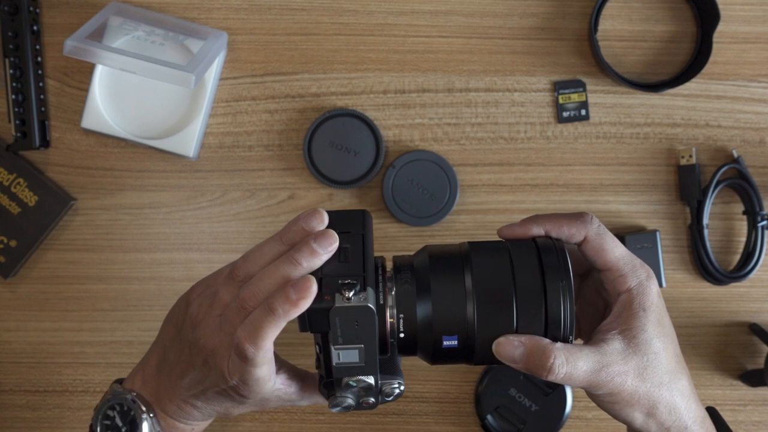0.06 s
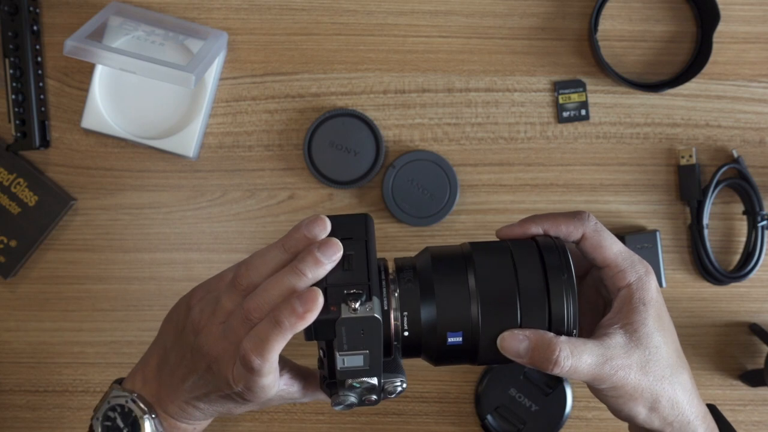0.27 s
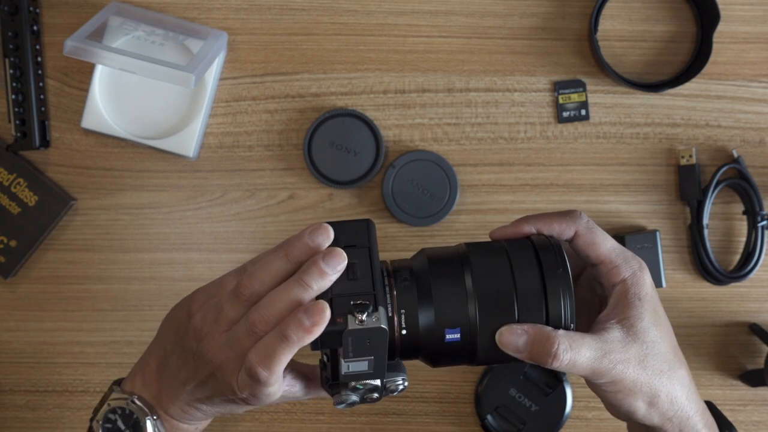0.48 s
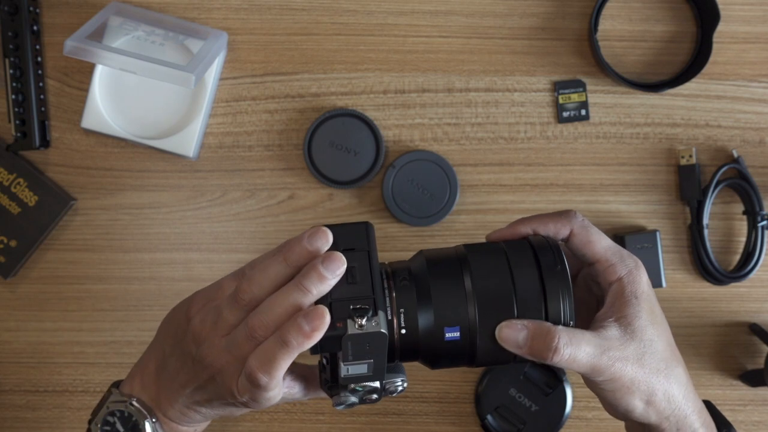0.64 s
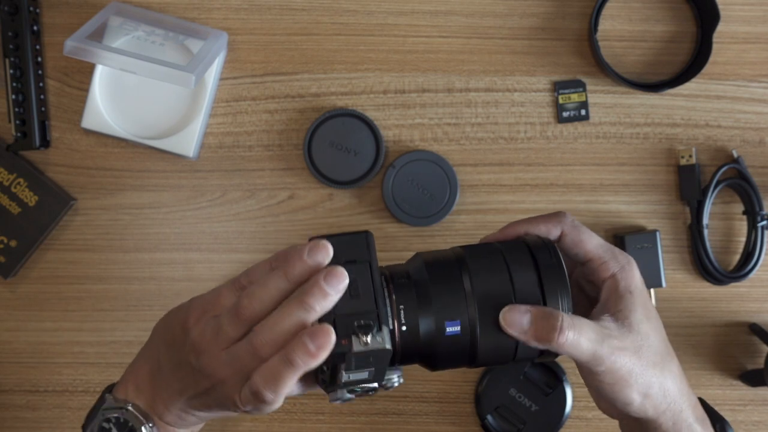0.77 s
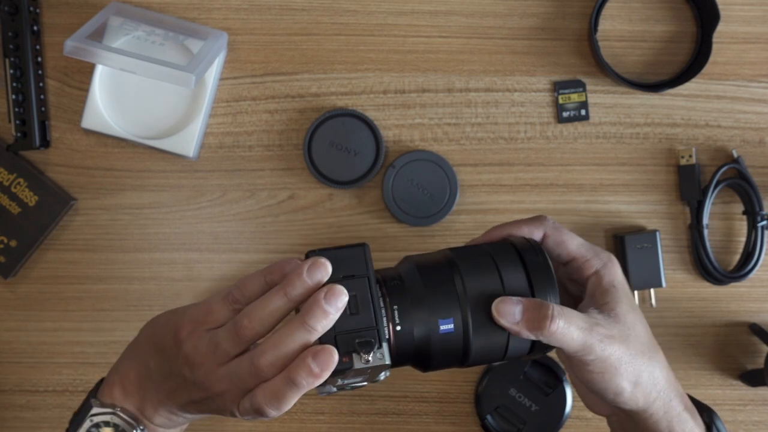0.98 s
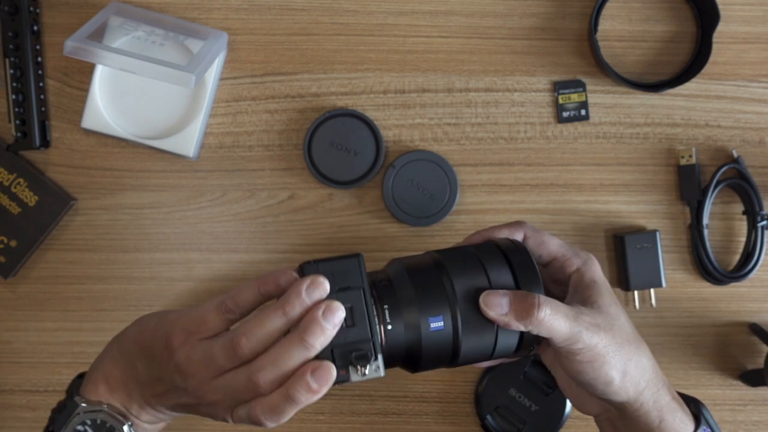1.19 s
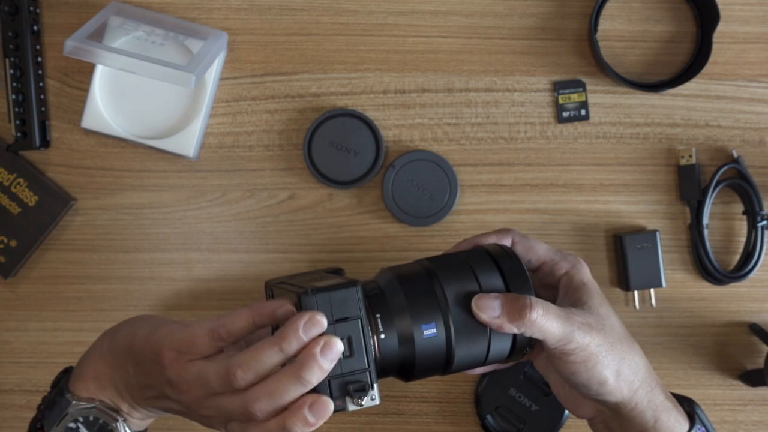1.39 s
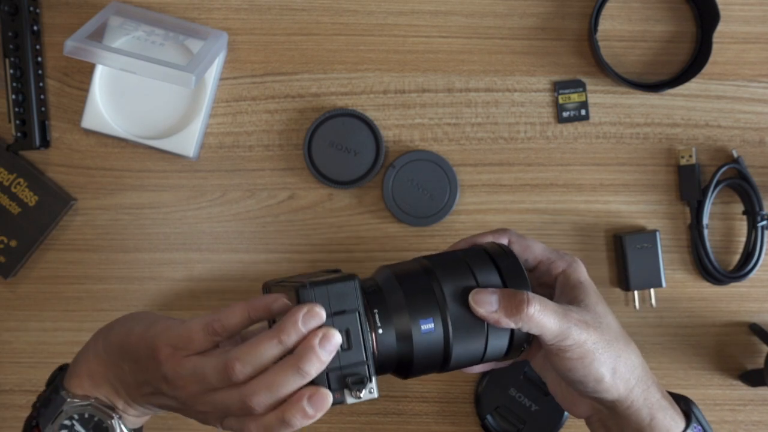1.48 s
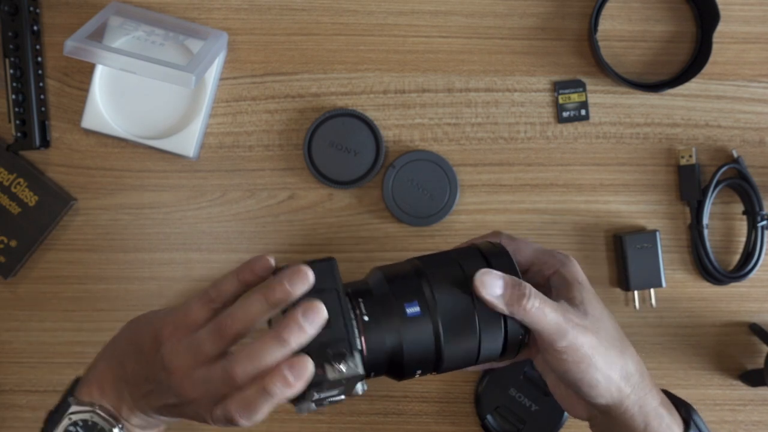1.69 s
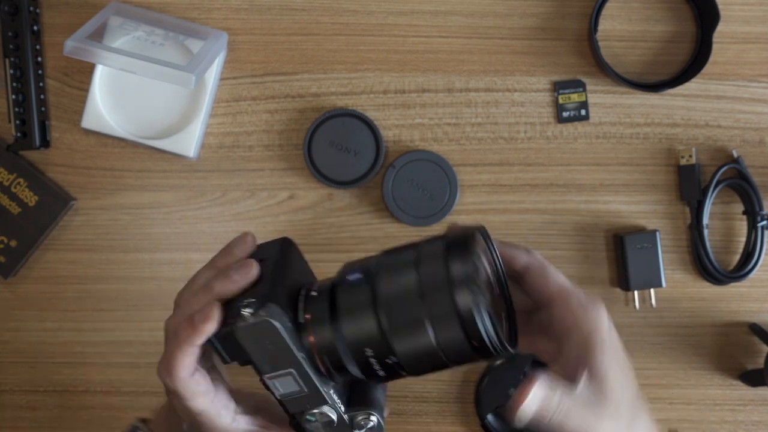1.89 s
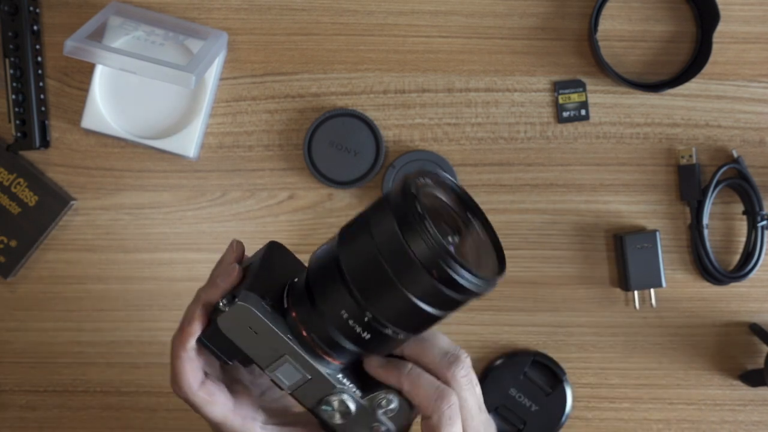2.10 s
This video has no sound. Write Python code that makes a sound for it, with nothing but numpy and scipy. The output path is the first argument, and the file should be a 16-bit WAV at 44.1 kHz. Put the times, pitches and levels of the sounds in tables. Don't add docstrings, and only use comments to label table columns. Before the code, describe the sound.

A camera lens is fitted onto a body: faint taps, one solid knock, a small touch, then a sharp metallic lock click and light handling ticks, close up in a small quiet room with low fan hum.

```python
import sys
import numpy as np
from scipy import signal
from scipy.fft import rfft, irfft, next_fast_len
from scipy.io import wavfile
from scipy.ndimage import uniform_filter1d

SR = 44100
rng = np.random.default_rng(int(sys.argv[2]) if len(sys.argv) > 2 else 0)


def digitize_waveform(pressure):
    field = np.atleast_2d(pressure).T
    bounded = np.clip(field, -1, 1)
    quanta = np.round(bounded * 32767).astype(np.int16)
    wavfile.write(sys.argv[1], SR, quanta)


def gain_from_db(level_db):
    decades = np.asarray(level_db, float) / 20
    return 10 ** decades


N = 94462

# pitch_hz, width_hz, level_db
FAN_DRONE = [(29.8, 12.6, -22), (53.6, 15, -21), (87, 19, -9), (111.9, 7.3, 1.5), (161.3, 16.4, 0),
             (220.3, 59, -12)]
# pitch_hz, width_hz, level_db
FAN_WHINE = [(958, 49, -1), (1530, 73, -2), (2175, 56, 5.5)]
# pitch_hz, level_db
AIR_COLOUR = [(18, -53), (30, -23), (157, -2), (394, -20.5), (913, -22.5), (1860, -24), (2230, -21.5),
              (2540, -27), (16000, -45)]
# pitch_hz, likeness (1 = same)
TONE_ALIKE = [(60, 1), (180, 0.98), (550, 0.063), (1650, 0.093), (4970, 0.097), (15000, 0.56)]
# pitch_hz, time_to_fall_60_db_s
ROOM_FADE = [(250, 0.25), (600, 0.39), (1500, 0.3), (4000, 0.35), (9000, 0.33), (15000, 0.3)]
# pitch_hz, level_db
ROOM_COLOUR = [(250, 0), (500, -2.5), (1500, -4), (3500, 1), (12000, 0)]
# pitch_hz, likeness (1 = same)
ROOM_ALIKE = [(200, 1), (1000, 0.77), (4000, 0.55), (12000, 0.57)]
# pitch_hz, left_minus_right_db
STEREO_LEAN = [(500, -1), (2000, -1), (6000, -3), (14000, -3.4)]
# time_s, level_db
RUB_LEVEL = [(0, -60), (0.098, -93), (.34, -94), (.375, -72), (.4, -87), (.66, -65.5), (.75, -73),
             (.9, -76), (.96, -71.5), (1.05, -88), (1.7, -74.5), (1.77, -58.5), (1.8, -62.5), (1.88, -70),
             (1.93, -66), (1.96, -54.5), (2.01, -71), (2.14, -65)]
# pitch_hz, level_db
RUB_COLOUR = [(1470, -27), (2500, -2), (4050, 6), (4580, 0), (5850, -1.5), (7320, 0), (14000, -9)]
# pitch_hz, width_hz, level_db
BODY_NOTES = [(255, 78, -9.5), (423, 22, 8), (533, 39, -3), (755, 26, 2.5), (869, 62, -2.5),
              (1204, 30.7, 5), (1340, 31.8, 8), (1479, 65.3, 7), (1770, 147, -7)]
# pitch_hz, width_hz, level_db
BARREL_NOTES = [(1545, 80, -4.5), (2067, 250, -7), (2279, 108, 0.5), (2666, 29, -1), (3033, 203, -10.5)]
# pitch_hz, width_hz, level_db
RING_NOTES = [(3498, 111, 4), (3831, 58, 8), (3870, 71, 8.5), (4600, 430, 2), (5460, 340, 1)]
# pitch_hz, width_hz, level_db
PIN_NOTES = [(6360, 570, 5.5), (8090, 990, 4), (9540, 990, 4.5), (12100, 2400, -2), (15600, 4300, -7)]
# start_s, body_db, barrel_db, steel_db, contact_ms
KNOCKS = [(.002, -49.5, -76, -81, 13.3), (.015, -51, -61, -61, 8), (0.0227, -39, -74, -55.5, 9),
          (.181, -53, -59.5, -66, 9.6), (0.192, -48.5, -54, -59.5, 11.8), (.406, -50.5, -63, -79, 14),
          (0.4209, -35.5, -57, -46, 11), (0.4362, -30, -36, -34, 3.4), (.4396, -17.5, -26, -26.5, 6),
          (.447, -22.5, -28.5, -28.5, 4), (.4515, -23.5, -35, -43, 4), (.686, -52.5, -59, -66, 29.4),
          (0.9143, -42.5, -43.5, -49.5, 5.85)]
# start_s, barrel_db, ring_db, pin_db, contact_ms
CLICKS = [(0.37, -73, -69, -67, 12), (0.9388, -53, -45, -60, 4.8), (.948, -55.5, -61.5, -62, 13.4),
          (1.128, -63, -65.5, -67.5, 11.7), (1.380, -50, -44, -48, 6.1), (1.3848, -27, -30, -30.5, 4),
          (1.401, -69, -38, -63.5, 7), (1.8116, -62, -44.5, -46, 2.2), (1.9075, -70, -54.5, -59, 2.1),
          (1.940, -75, -53, -59, 8.6), (1.972, -74, -58, -55.5, 9), (2.044, -67, -61, -74.5, 6.7),
          (2.1246, -70, -44.5, -43.5, 4.7)]

DRONE_DB, WHINE_DB, AIR_DB = -52.5, -64, -61.5
ROOM_DB, ROOM_DELAY_S = -4.5, 0.0044
KNOCK_ROOM_DB, CLICK_ROOM_DB = 0.5, 2.5
ROOM_BLUR = 0.6
THUD_DB, CRACK_DB = -19.5, -11.5
SCATTER_DB = 1.5
RISE = 0.152
KNOCK_EDGE_HZ, PIN_IN_KNOCK_DB = 5340, -4.5
DAMP_PER_DB = 0.15
CLICK_EDGE_HZ, CLICK_OCTAVES_PER_DB = 27000, 0.17
TREBLE_TOP_HZ = 15750


def unit(x):
    return x / np.sqrt(np.mean(x ** 2) + 1e-20)


def along(points, hz):
    f, v = np.transpose(points)
    return np.interp(np.log(hz + 1), np.log(f + 1), v)


def filtered(x, response):
    n = x.shape[-1]
    size = next_fast_len(n + 8192)
    hz = np.fft.rfftfreq(size, 1 / SR)
    return irfft(rfft(x, size) * response(hz), size)[..., :n]


def resonant(notes, f, scatter_db=0):
    scatter = np.broadcast_to(scatter_db, len(notes))
    total = 0
    for k, (pitch, width, db) in enumerate(notes):
        peak = 1j * f * width / (pitch * pitch - f * f + 1j * f * width)
        total = total + (-1) ** k * gain_from_db(db + scatter[k]) * peak
    return total


def spread(pair, gain, alike):
    def response(hz):
        turn = np.arccos(np.clip(along(alike, hz), -1, 1)) / 2
        return gain(hz) * np.array([np.cos(turn), np.sin(turn)])

    mid, side = filtered(pair, response)
    return np.array([mid + side, mid - side])


def room_tone():
    def drone_gain(f):
        low_cut = (f / 60) ** 2 / (1 + (f / 60) ** 2)
        return resonant(FAN_DRONE, f) * low_cut / (1 + (f / 260) ** 4)

    def whine_gain(f):
        return resonant(FAN_WHINE, f)

    def air_gain(f):
        low_cut = (f / 200) ** 2 / (1 + (f / 200) ** 2)
        return gain_from_db(along(AIR_COLOUR, np.maximum(f, 300))) * low_cut

    tone = 0
    for gain, db in [(drone_gain, DRONE_DB), (whine_gain, WHINE_DB), (air_gain, AIR_DB)]:
        noise = rng.standard_normal((2, N))
        tone = tone + gain_from_db(db) * unit(spread(noise, gain, TONE_ALIKE))
    return tone


def room_tail():
    noise = rng.standard_normal((2, SR // 2))
    hz, t, z = signal.stft(noise, SR, nperseg=128)
    fade = gain_from_db(-60 * t / along(ROOM_FADE, hz)[:, None])
    tail = signal.istft(z * fade, SR, nperseg=128)[1]
    tail = spread(tail, lambda f: gain_from_db(along(ROOM_COLOUR, f)), ROOM_ALIKE)
    return np.pad(tail / np.linalg.norm(tail[0]), ((0, 0), (round(ROOM_DELAY_S * SR), 0)))


def rub():
    grains = rng.standard_normal((2, N)) * gain_from_db(2 * rng.exponential(size=N))

    def gain(f):
        return gain_from_db(along(RUB_COLOUR, f)) * (0.5 + 0.31 * abs(resonant(RING_NOTES, f)))

    time_s, level_db = np.transpose(RUB_LEVEL)
    level = np.interp(np.arange(N) / SR, time_s, level_db, left=-120)
    return unit(spread(grains, gain, ROOM_ALIKE)) * gain_from_db(level)


def scrape(ms, size):
    u = np.arange(round(2.5 * ms * SR / 1000)) / SR * 1000 / ms
    shape = np.minimum(u / RISE, 1) * np.exp(-(u ** 2.7))
    force = rng.standard_normal(size)[:len(u)] * shape
    for _ in range(4):
        z = rfft(force)
        force = irfft(z / (abs(z) + 1e-9), len(u))
        strength = np.sqrt(abs(uniform_filter1d(force ** 2, size=24)))
        force = force * shape / (strength + 1e-9) ** 0.5
    return np.pad(force, (0, size - len(u)))


def strike(start_s, ms, parts, edge_hz, room_db):
    length = SR // 8
    ms = max(ms, 1)
    force = scrape(ms, length)
    impulse = np.zeros(length)
    impulse[round(ms * SR / 2000)] = 1
    near = wet = 0
    for notes, broad, db in parts:
        scatter = SCATTER_DB * rng.standard_normal(len(notes))

        def dull(f):
            return 1 / (1 + 1.4j * f / edge_hz - (f / edge_hz) ** 2)

        def colour(f):
            return (resonant(notes, f, scatter) + broad(f)) * dull(f)

        def even_colour(f):
            level = np.hypot(abs(resonant(notes, f, scatter)), abs(broad(f))) ** ROOM_BLUR
            return level * abs(dull(f)) * np.exp(1j * np.angle(colour(f)))

        strength = gain_from_db(db) * np.sqrt(ms * SR / 1000)
        ring = filtered(force, colour)
        even = filtered(impulse, even_colour)
        near = near + strength * ring / np.linalg.norm(ring)
        sent = strength * even[None] / np.linalg.norm(even)
        wet = wet + signal.fftconvolve(sent, room_tail(), axes=1)
    out = np.zeros((2, N + 2 * SR))
    at = round(start_s * SR)
    out[:, at:at + length] += near
    out[:, at:at + wet.shape[1]] += gain_from_db(ROOM_DB + room_db) * wet
    return out[:, :N]


def thud(f):
    return gain_from_db(THUD_DB) * (1j * f / (350 + 1j * f)) ** 2 / (1 + 1j * f / 1800)


def crack(f):
    return gain_from_db(CRACK_DB) * (1j * f / (2500 + 1j * f)) ** 2


def knocks():
    steel = RING_NOTES + [(pitch, width, db + PIN_IN_KNOCK_DB) for pitch, width, db in PIN_NOTES]
    top_db = max(row[1] for row in KNOCKS)
    out = 0
    for start_s, body_db, barrel_db, steel_db, ms in KNOCKS:
        damping = 1 + DAMP_PER_DB * abs(top_db - body_db)
        body = [(pitch, width * damping, db) for pitch, width, db in BODY_NOTES]
        parts = [(body, thud, body_db), (BARREL_NOTES, thud, barrel_db), (steel, crack, steel_db)]
        out = out + strike(start_s, ms, parts, KNOCK_EDGE_HZ, KNOCK_ROOM_DB)
    return out


def clicks():
    top_db = max(row[3] for row in CLICKS)
    out = 0
    for start_s, barrel_db, ring_db, pin_db, ms in CLICKS:
        edge_hz = CLICK_EDGE_HZ * 2 ** (CLICK_OCTAVES_PER_DB * (pin_db - top_db))
        parts = [(BARREL_NOTES, thud, barrel_db), (RING_NOTES, np.zeros_like, ring_db),
                 (PIN_NOTES, crack, pin_db)]
        out = out + strike(start_s, ms, parts, edge_hz, CLICK_ROOM_DB)
    return out


def scene():
    sides = np.array([[1], [-1]])
    handling = knocks() + clicks() + rub()
    near = filtered(handling, lambda f: gain_from_db(along(STEREO_LEAN, f) / 2 * sides))
    return room_tone() + near


def low_pass(x):
    return signal.sosfilt(signal.butter(12, 16660, fs=SR, output="sos"), x)


def record(dry):
    mix = filtered(dry, lambda f: 1 / np.sqrt(1 + (f / TREBLE_TOP_HZ) ** 40))
    return low_pass(mix)


dry = scene()
out = record(dry)
digitize_waveform(out)
```